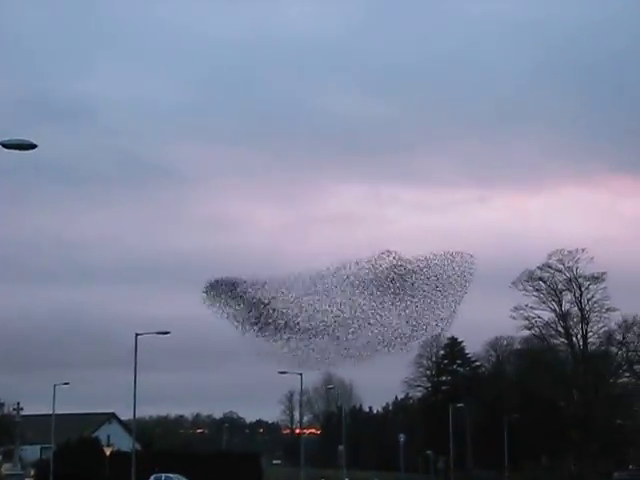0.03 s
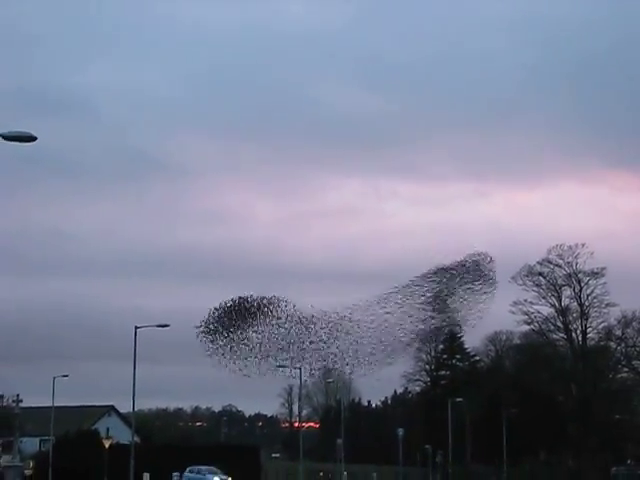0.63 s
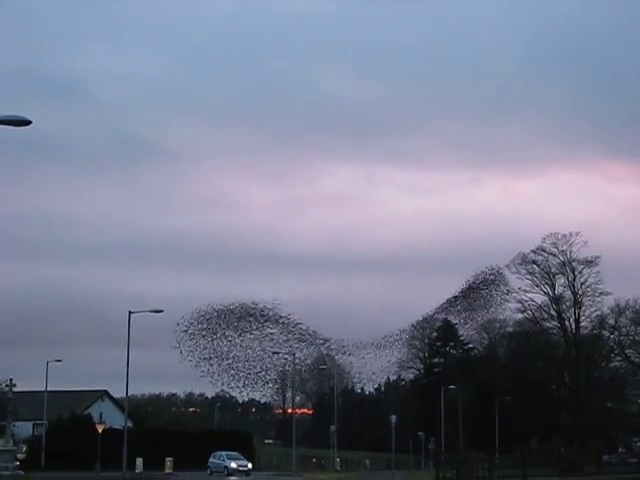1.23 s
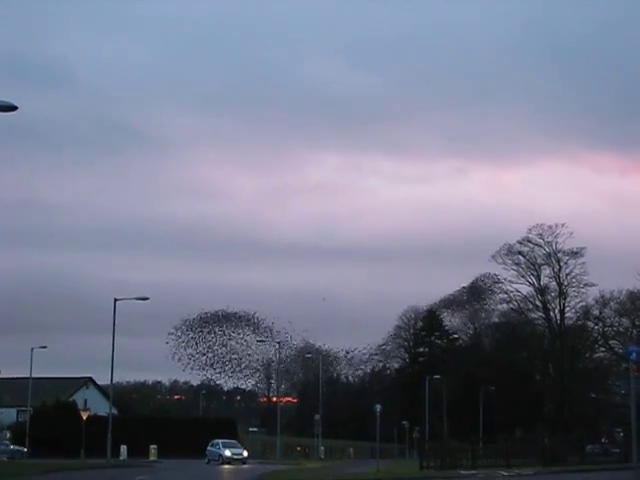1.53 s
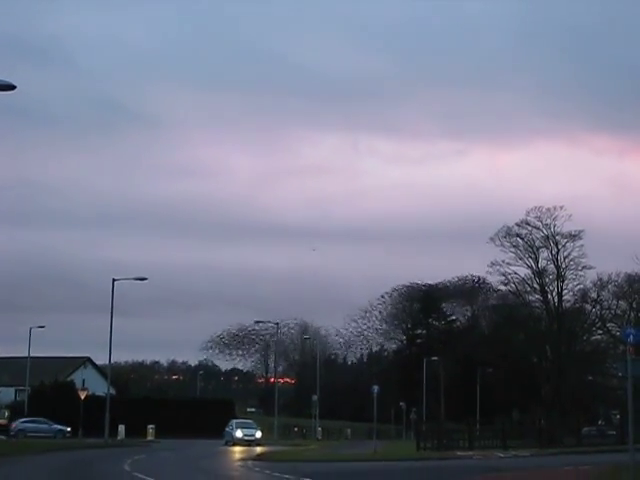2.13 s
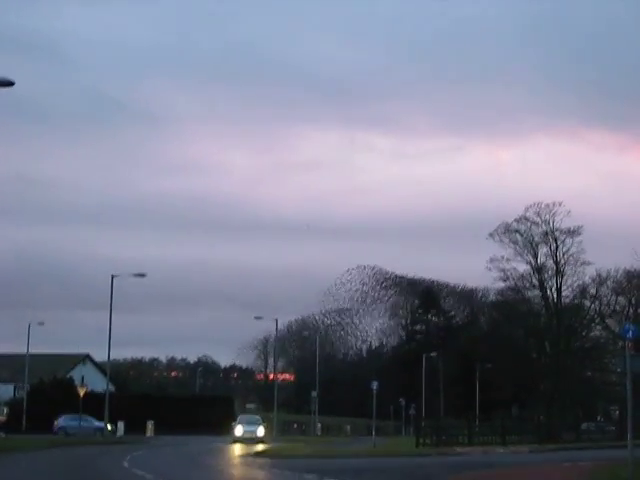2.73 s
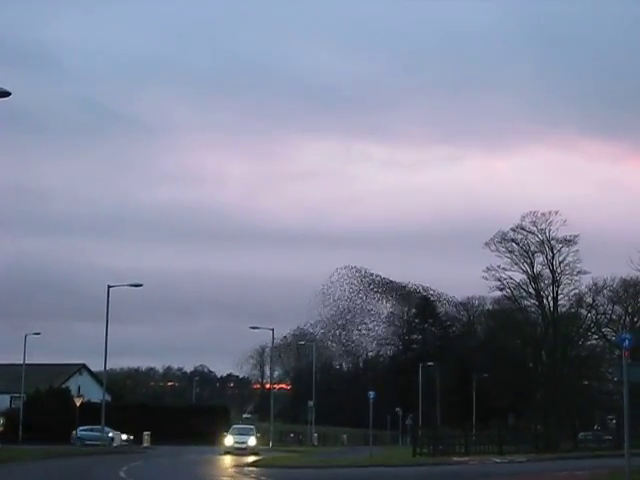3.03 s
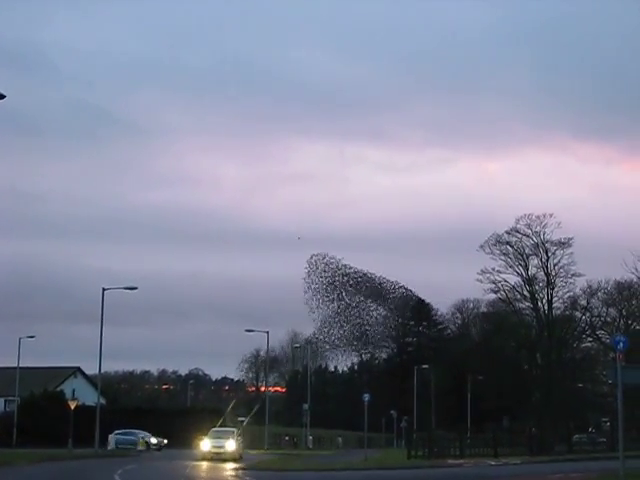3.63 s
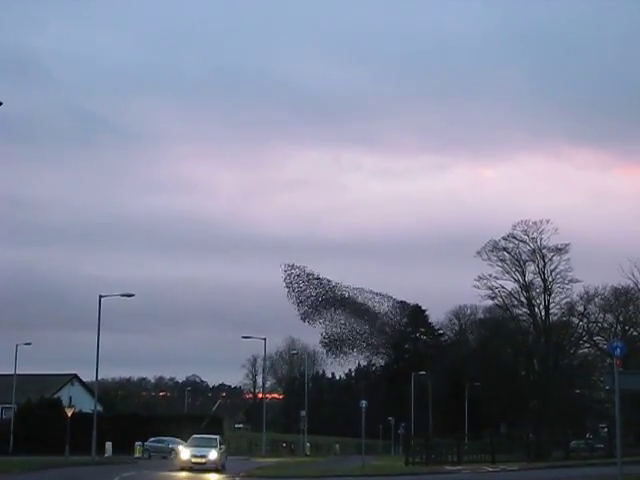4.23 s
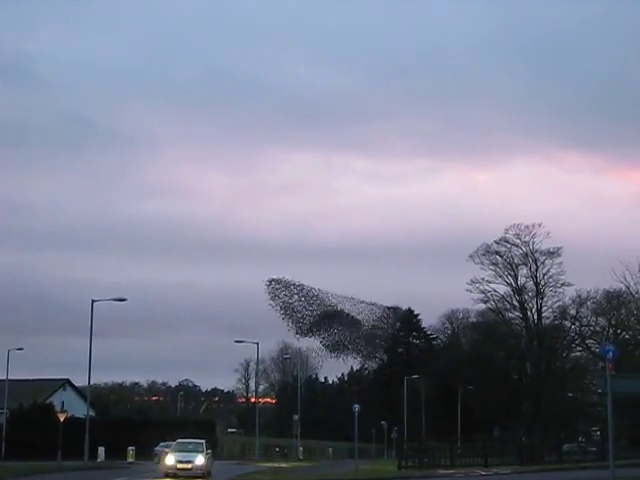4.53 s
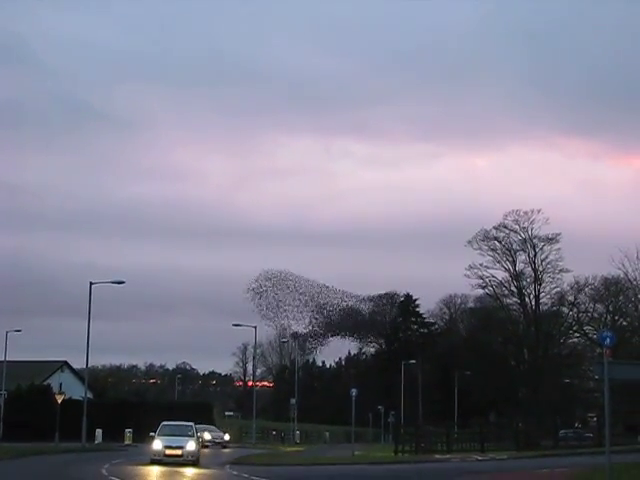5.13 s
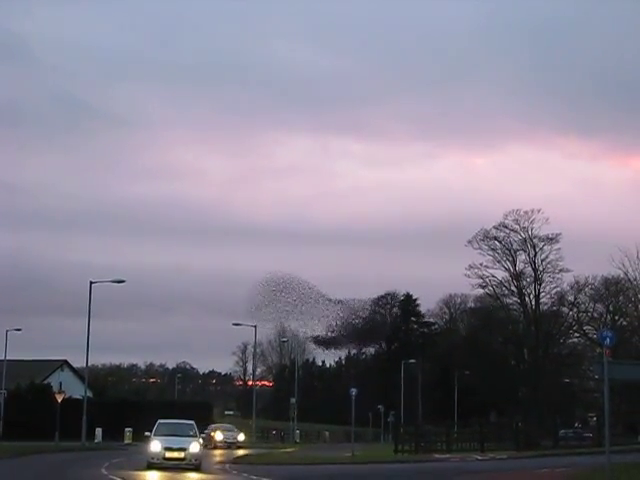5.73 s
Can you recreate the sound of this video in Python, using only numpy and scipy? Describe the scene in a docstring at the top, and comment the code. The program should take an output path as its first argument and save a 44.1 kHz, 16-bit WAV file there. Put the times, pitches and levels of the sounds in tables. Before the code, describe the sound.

From inside a stopped car, an idling diesel throbs and knocks steadily while a fan hums and far traffic rumbles.

```python
"""Idling diesel at dusk

Inside a car standing by a road, on a camera's stereo microphone. Close by, the four-cylinder diesel
idles at 750 rpm: its firings throb in the cabin and shake the panels, the engine clatters dully, one
cylinder knocks hardest and a fan hums. Distant traffic rumbles in, muffled by the car body.
Right at the microphone, the camera adds a faint hiss and a thin pulsing whine."""
import sys
import numpy as np
from scipy import signal
from scipy.fft import rfft, irfft
from scipy.io import wavfile

SR = 44100
rng = np.random.default_rng(int(sys.argv[2]) if len(sys.argv) > 2 else 0)


def dump(signal):
    """Clip the signal to [-1, 1] and save it as 16-bit WAV at the path in sys.argv[1]."""
    limited = np.clip(np.atleast_2d(signal).T, -1, 1)
    pcm = np.round(limited * 32767).astype(np.int16)
    wavfile.write(sys.argv[1], SR, pcm)


N = 259308
T = np.arange(N) / SR
FREQS = np.maximum(np.fft.rfftfreq(N, 1 / SR), 1)

FIRING_HZ, FIRST_FIRING_S = 25.0015, .0018
CABIN_HZ, CABIN_WIDTH_HZ, CABIN_GAIN = 63, 12, 3  # the cabin's lowest air mode

# The throb around the microphone. Each row: multiple of the firing rate, level in dB.
ENGINE_ORDERS = [(1, -36), (2, -34.5), (2.5, -40.5), (3, -32), (4, -42.5), (5, -42.5)]
# The four cylinders in firing order. Each row: clatter, knock and shake, all in relative dB.
CYLINDER_STRENGTHS = [(-2.5, 0, -1), (-5, 5.5, -0.5), (-3, -2, -1.5), (-4, 2.5, -2)]
# Body panels around the cabin. Each row: frequency in Hz, width in Hz, relative gain in dB.
PANEL_MODES = [(161, 15.3, -1), (261.1, 11.8, 3), (335.4, 12.7, -5), (444.6, 10.4, -10),
               (557.2, 12.3, -7.5)]
# The clattering engine. Each row: frequency in Hz, width in Hz, relative gain in dB.
CLATTER_MODES = [(254, 103, 0), (439, 46, -1), (573, 43.5, 3.5), (753, 45.5, 1), (950, 103, -6.5)]
# The block under a knock. Each row: frequency in Hz, width in Hz, relative gain in dB.
BLOCK_MODES = [(1463, 155, 10), (1738, 310, 8.5), (2220, 160, -6), (3347, 150, -2.5), (3790, 310, -5)]
# Firings where the charge can ignite harder. Each row: time in seconds, extra knock in dB.
HARD_IGNITIONS = [(1.64, 1.5), (3.24, 2), (3.72, 0), (4.2, 0), (5.0, 3.5), (5.16, 2)]
# Stereo width of diffuse sound. Each row: frequency in Hz, side minus mid in dB.
STEREO_WIDTH = [(60, -30), (200, -14), (400, -14.5), (700, -14), (1300, -5.5), (2400, -2.5), (5000, 0.5)]
# Fan and belt. Each row: frequency in Hz, level in dB.
FAN_TONES = [(141, -44.5), (423, -49.5), (875, -61), (1350, -71)]
# Far traffic through the car body. Each row: frequency in Hz, density in dB per Hz before gain.
TRAFFIC_SPECTRUM = [(15, -72), (35, -63), (60, -56), (115, -59), (210, -67), (340, -69), (470, -71),
                    (580, -71), (780, -73), (960, -77), (1200, -88), (1800, -90), (2700, -98),
                    (15000, -135)]
# The microphone's own hiss. Each row: frequency in Hz, density in dB per Hz.
HISS_SPECTRUM = [(1000, -108), (3700, -98), (4800, -103), (7500, -104.3), (9500, -107.5), (12000, -109),
                 (15500, -114.5)]


def undb(db):
    """Decibels to gain."""
    return 10 ** (np.asarray(db) / 20)


def level(x, db):
    """Scale to an rms level."""
    return x * undb(db) / np.sqrt(np.mean(x ** 2))


def pan(db):
    """Left and right gains, with the left `db` above the right."""
    return undb(np.array([[db], [-db]]) / 2)


def wander(rate_hz):
    """Slow random motion with an rms of 1, mostly below `rate_hz`."""
    lowpass = np.exp(-(np.fft.rfftfreq(N, 1 / SR) / rate_hz) ** 2)
    return level(irfft(rfft(rng.standard_normal(N)) * lowpass, N), 0)


def shape(x, points):
    """Filter by (Hz, dB) points joined on a log-frequency axis."""
    hz, db = np.transpose(points)
    return irfft(rfft(x) * undb(np.interp(np.log(FREQS), np.log(hz), db)), N)


def noise(points):
    """Noise with the given density in dB per Hz."""
    return shape(rng.standard_normal(N), points) * np.sqrt(SR / 2)


def resonance(hz, centre_hz, width_hz):
    """Complex response of one mode, gain 1 at its centre."""
    return 1 / (1 + 1j * (hz / centre_hz - centre_hz / hz) * centre_hz / width_hz)


def ring(x, modes):
    """Pass a sound through steep resonances."""
    response = sum(undb(db) * resonance(FREQS, hz, 2 * width) ** 2 for hz, width, db in modes)
    return irfft(rfft(x) * response, N)


def diffuse(mid, side):
    """Sound from all around the microphone: left and right share the bass and differ in the treble."""
    side = shape(side, STEREO_WIDTH)
    return np.array([mid + side, mid - side])


def ringing_bursts(times, strengths_db, modes, rise_s, decay_s):
    """Noise bursts peak at the given times and ring the modes, in diffuse stereo."""
    envelope = np.zeros(N)
    for peak_s, gain in zip(times, undb(strengths_db)):
        span = slice(*np.searchsorted(T, [peak_s - .1, peak_s + .1]))
        age = T[span] - peak_s
        envelope[span] += gain * np.exp(np.minimum(age / rise_s, -age / decay_s))
    mid, side = (ring(envelope * rng.standard_normal(N), modes) for _ in range(2))
    return diffuse(mid, side)


def firing_count(wobble_s=0.00042):
    """Firings counted since the first; the governor holds the speed with a slight wobble."""
    return FIRING_HZ * (T - FIRST_FIRING_S + wobble_s * wander(4.4))


def cabin_throb(firings, waver_db=.5):
    """Each firing is a pressure dip at the microphone; the cabin's air mode makes it swing back."""
    throb = 0
    for order, db in ENGINE_ORDERS:
        mode_phase = np.angle(1 + CABIN_GAIN * resonance(order * FIRING_HZ, CABIN_HZ, CABIN_WIDTH_HZ))
        amplitude = np.sqrt(2) * undb(db + waver_db * wander(3.4))
        throb -= amplitude * np.cos(2 * np.pi * order * (firings - 1) + mode_phase)
    return throb


def panel_drone(firings, drone_db=-40, scatter_db=1):
    """Every firing jolts the body through the engine mounts, and the panels close by drone."""
    firing = np.floor(firings).astype(int)
    shake_db = np.array(CYLINDER_STRENGTHS)[firing % 4, 2] + scatter_db * rng.standard_normal(N)
    jolts = np.diff(firing, prepend=firing[0]) * undb(shake_db)
    return level(ring(jolts, PANEL_MODES), drone_db)


def combustion(clatter_db=-46, knock_db=-60.5, clatter_lag_s=0.0074):
    """Every firing rattles the engine and rings the block, each cylinder with its own strength."""
    firing = np.arange(int(N / SR * FIRING_HZ) + 1)
    times = FIRST_FIRING_S + firing / FIRING_HZ
    scatter_db = [0.7, 1.9] * rng.standard_normal((len(firing), 2))  # clatter, knock
    rattles_db, knocks_db = (np.array(CYLINDER_STRENGTHS)[firing % 4, :2] + scatter_db).T
    for time_s, extra_db in HARD_IGNITIONS:
        knocks_db[np.argmin(abs(times - time_s))] += extra_db
    clatter = ringing_bursts(times + clatter_lag_s, rattles_db, CLATTER_MODES, rise_s=.0096, decay_s=.024)
    knock = ringing_bursts(times, knocks_db, BLOCK_MODES, rise_s=.0089, decay_s=.012)
    return level(clatter, clatter_db) + level(knock, knock_db) * pan(db=-3.5)  # knock right of centre


def fan_hum(drift=0.00201, waver_db=2.5):
    """Tones of the fan and belt, dead centre, drifting together in pitch and wavering in level."""
    drifting_time = np.cumsum(1 + drift * wander(2.61)) / SR
    hum = 0
    for hz, db in FAN_TONES:
        amplitude = np.sqrt(2) * undb(db + waver_db * wander(3.3))
        hum += amplitude * np.sin(2 * np.pi * (hz * drifting_time + rng.random()))
    return hum


def distant_traffic(gain_db=-1, swell_db=-0.2):
    """Tyres of many far cars merge into a rumble that barely swells."""
    rumble = diffuse(noise(TRAFFIC_SPECTRUM), noise(TRAFFIC_SPECTRUM))
    return rumble * undb(gain_db + swell_db * wander(1)) * pan(db=-0.04)


def camera_noise(whine_hz=7867, whine_db=-75, frame_hz=29.97):
    """Hiss of each microphone, and a whine that sets in, swells and fades with every picture read-out."""
    frame_phase = T * frame_hz % 1
    onset = np.clip((frame_phase - 0.45) / 0.04, 0, 1)
    swell = np.exp(-((frame_phase - 0.52) / 0.47) ** 2)
    whine = onset * swell * np.sin(2 * np.pi * whine_hz * frame_phase / frame_hz)
    hiss = np.array([noise(HISS_SPECTRUM), noise(HISS_SPECTRUM)])
    return hiss + level(whine, whine_db)


def scene():
    """From inside the cabin: the engine close, the traffic far off, the camera at the microphone."""
    firings = firing_count()
    engine = cabin_throb(firings) + panel_drone(firings) + combustion()
    return engine + fan_hum() + distant_traffic() + camera_noise()


def record(dry, low_hz=16, top_hz=15700):
    """The microphone drops the deepest rumble and the recorder cuts the top steeply."""
    low_cut = signal.butter(2, low_hz, "highpass", fs=SR, output="sos")
    top_cut = signal.ellip(10, .1, 80, top_hz, fs=SR, output="sos")
    _, response = signal.sosfreqz(np.vstack([low_cut, top_cut]), FREQS, fs=SR)
    return irfft(rfft(dry) * abs(response), N)


dry = scene()
out = record(dry)
dump(out)
```